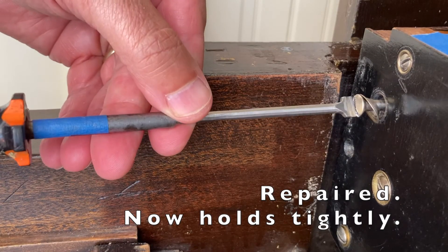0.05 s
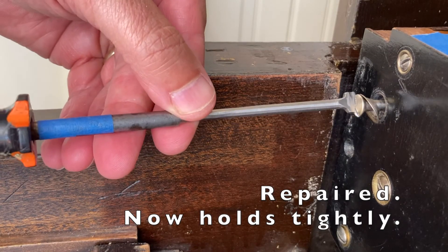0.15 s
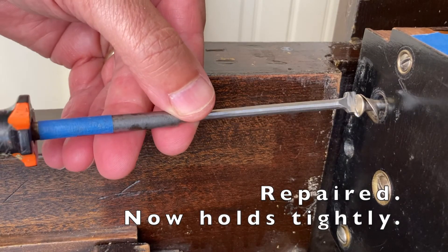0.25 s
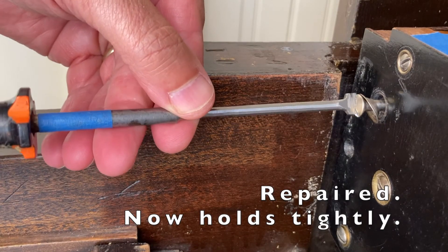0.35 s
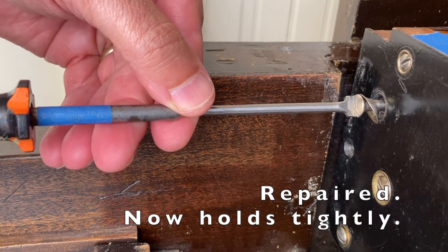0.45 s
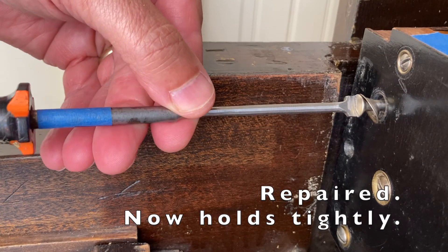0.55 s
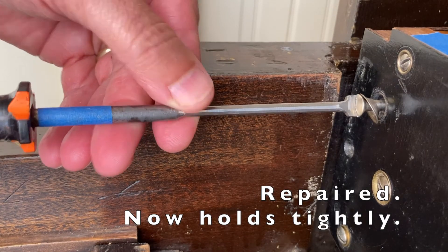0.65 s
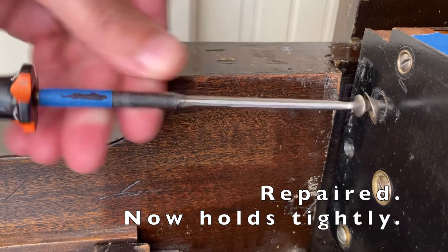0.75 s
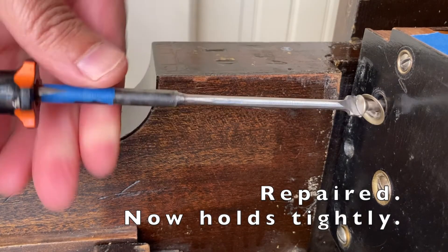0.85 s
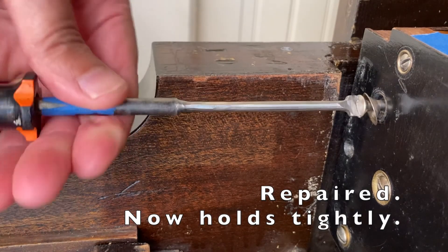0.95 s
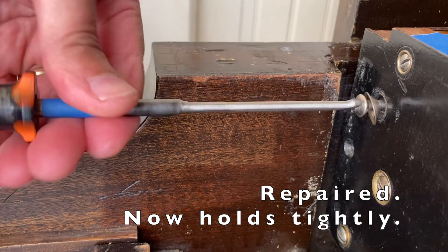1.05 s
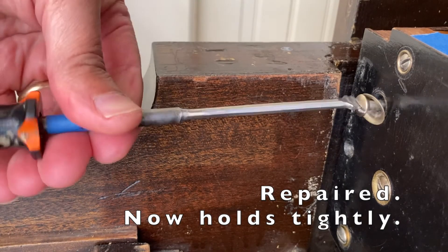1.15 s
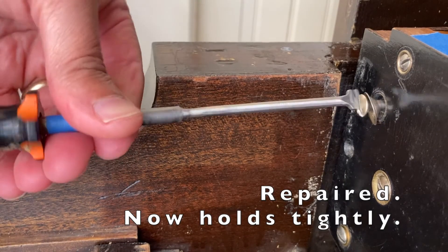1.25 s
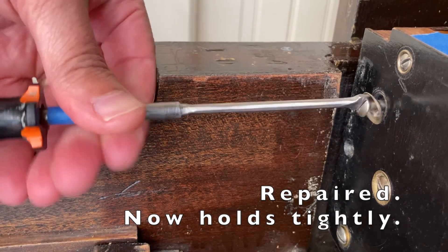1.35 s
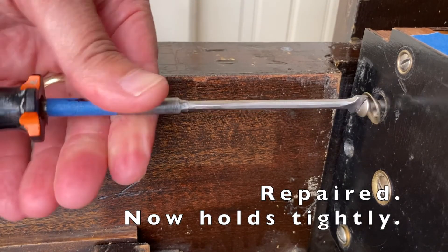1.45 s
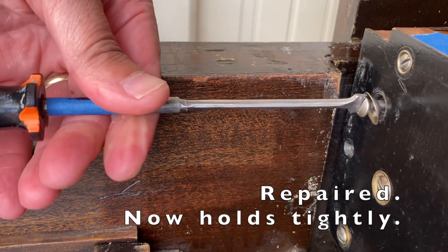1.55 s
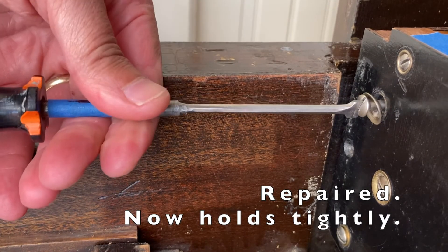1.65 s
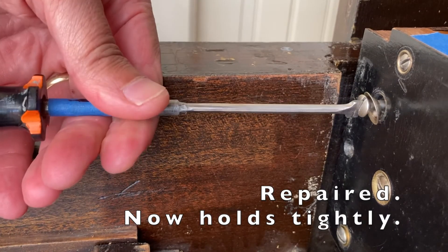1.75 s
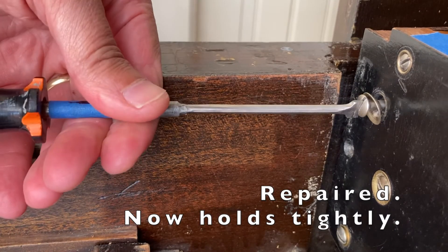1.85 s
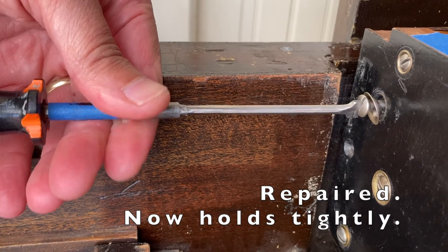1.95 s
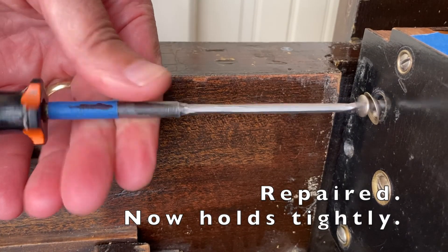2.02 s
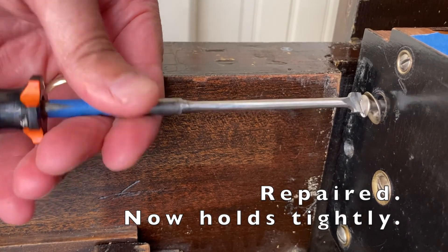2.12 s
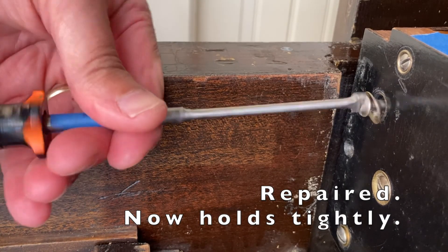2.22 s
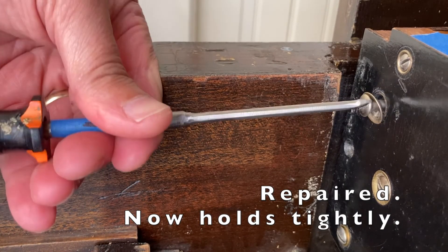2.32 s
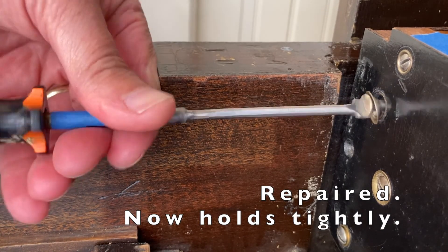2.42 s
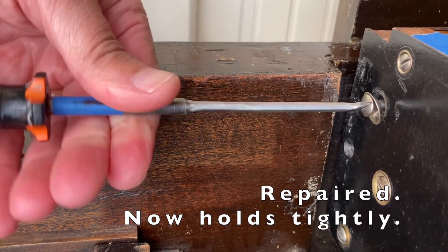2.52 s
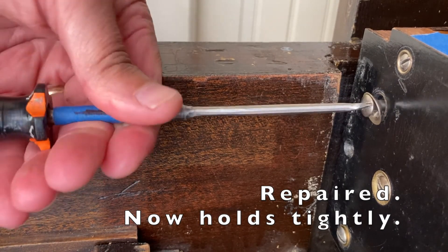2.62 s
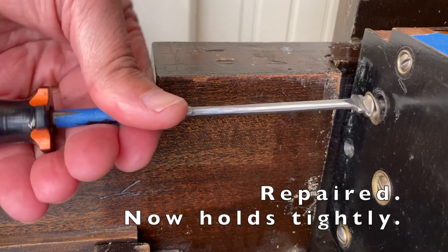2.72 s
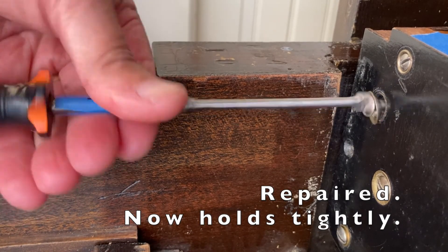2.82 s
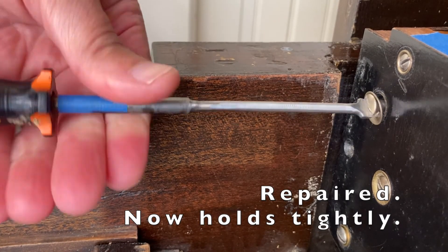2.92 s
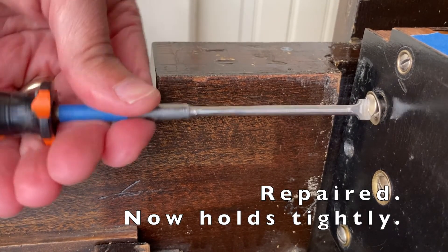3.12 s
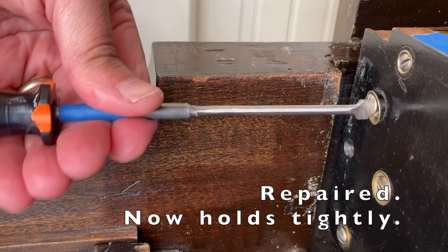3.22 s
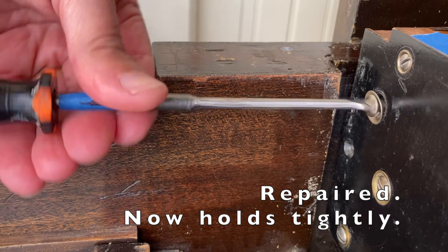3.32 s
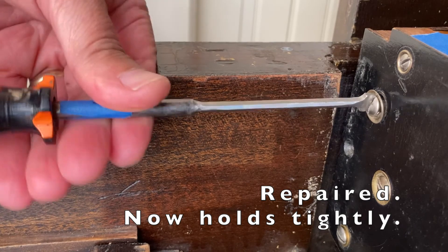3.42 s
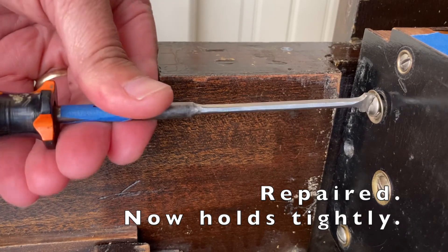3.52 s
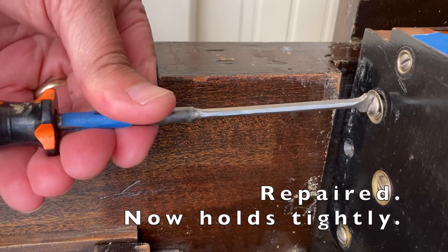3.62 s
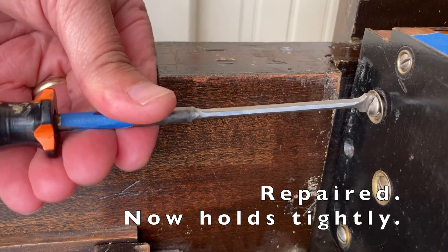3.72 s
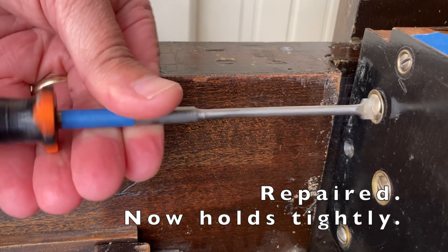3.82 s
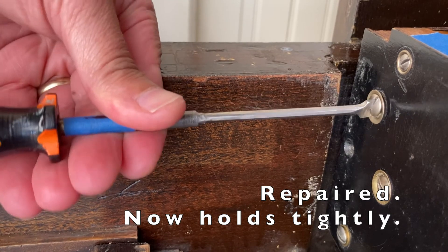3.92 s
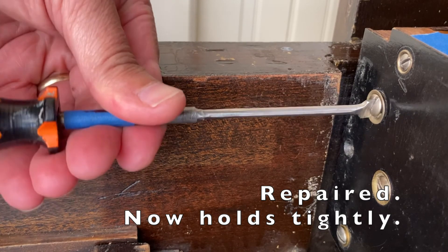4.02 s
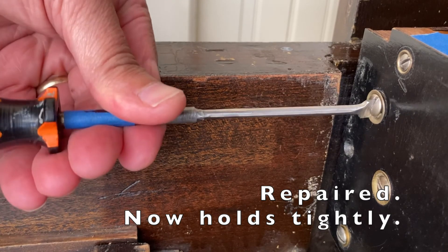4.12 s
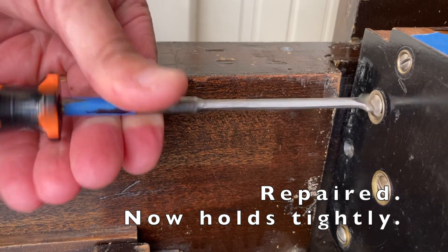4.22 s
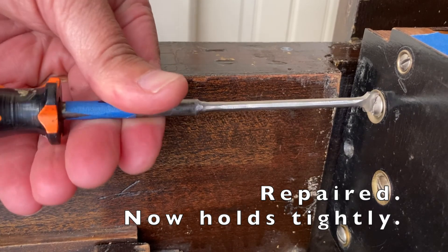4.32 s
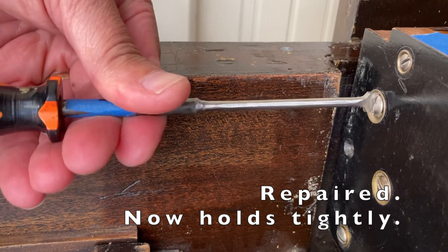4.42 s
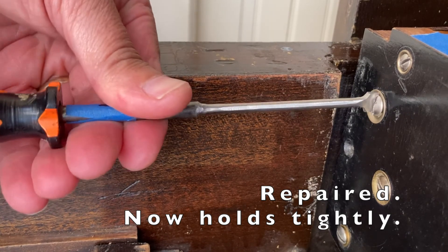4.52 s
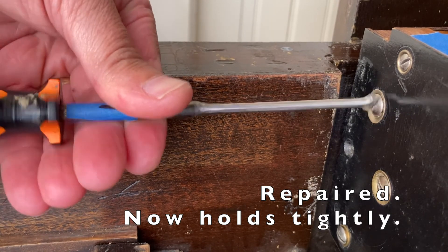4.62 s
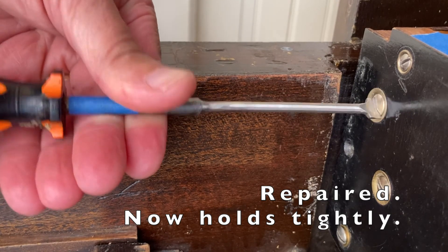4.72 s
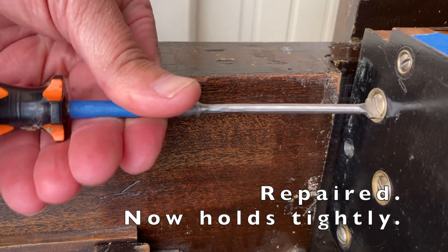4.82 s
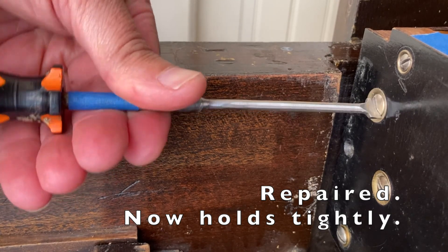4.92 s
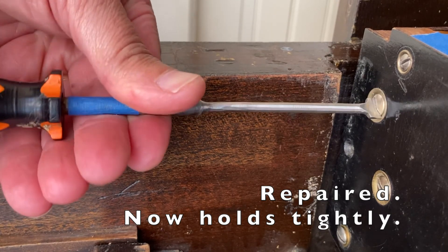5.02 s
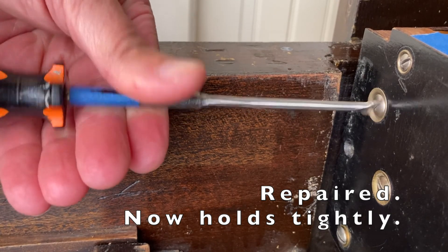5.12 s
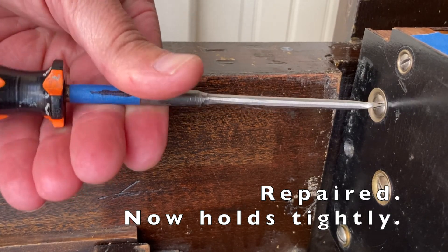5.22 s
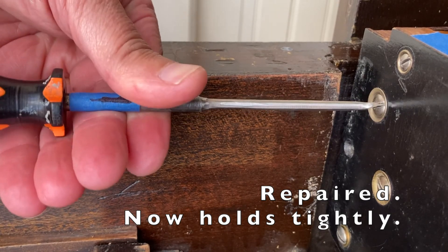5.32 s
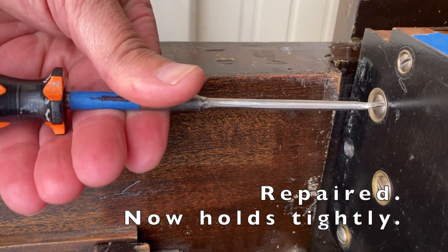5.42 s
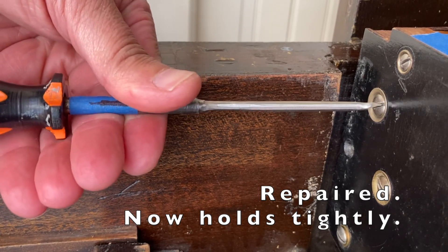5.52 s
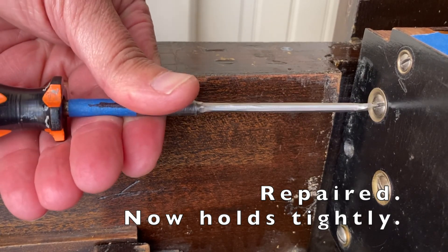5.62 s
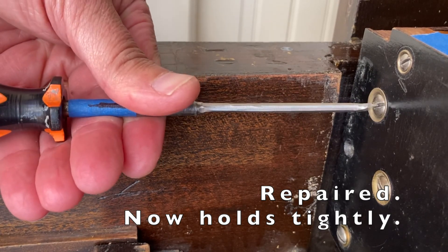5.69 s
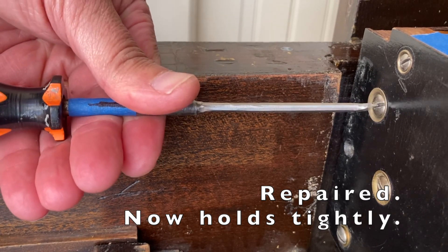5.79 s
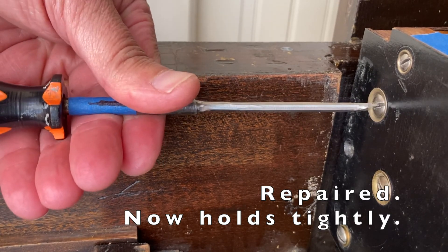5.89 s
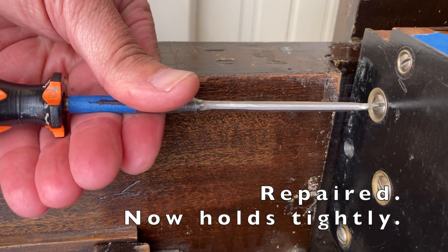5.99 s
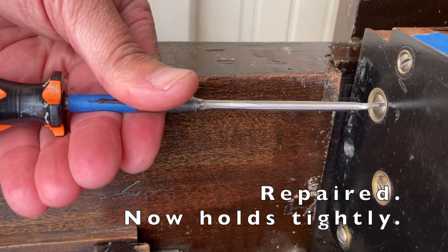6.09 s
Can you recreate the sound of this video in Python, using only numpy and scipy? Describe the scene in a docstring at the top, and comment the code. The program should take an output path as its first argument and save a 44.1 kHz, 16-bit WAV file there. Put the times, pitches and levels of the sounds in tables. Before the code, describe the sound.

Close, dry ticks and hollow wooden knocks as a hand twists a screwdriver, with short creaks, gritty scraping and faint skin hiss indoors.

```python
"""A flat screwdriver turns a slotted brass screw through a metal plate into a wooden case, close by.
From the start a small room rumbles faintly and the hand jostles the case, in low lumps of noise.
Soon the blade rasps (narrow noise), ticks (noise snaps, tool ring) and knocks the case (fading sines).
Then come squeaks and groans (gliding sines), and twist after twist of skin hiss, thread scrape and grit.
Near the end the hand comes to rest, amid the last knocks, ticks and twists."""
import sys
import numpy as np
from scipy import signal
from scipy.fft import rfft, irfft, next_fast_len
from scipy.io import wavfile
from scipy.ndimage import map_coordinates

SR = 44100
rng = np.random.default_rng(int(sys.argv[2]) if len(sys.argv) > 2 else 0)


def transcribe(signal):
    """Save signal, clipped to [-1, 1], as a 16-bit WAV file at the path in sys.argv[1]."""
    frames = np.atleast_2d(signal).T
    limited = np.clip(frames, -1, 1)
    pcm = np.round(limited * 32767).astype(np.int16)
    wavfile.write(sys.argv[1], SR, pcm)


N = 271215  # length in samples


def amp(db):
    """Turn decibels into a factor of amplitude."""
    return 10 ** (np.asarray(db) / 20)


def unit(x):
    """Scale a sound to rms 1."""
    return x / np.sqrt(np.mean(x ** 2) + 1e-20)


def along(points, hz):
    """Read a curve of (f/Hz, value) points on a log frequency axis."""
    f, v = np.transpose(points)
    return np.interp(np.log(hz + 1), np.log(f + 1), v)


def wobble(rate, size=N):
    """A smooth random curve through `rate` random points a second."""
    return map_coordinates(rng.standard_normal(int(size * rate / SR) + 4), [np.arange(size) * rate / SR])


def filtered(x, response):
    """Multiply the spectrum of x by a (possibly complex) function of frequency."""
    n = x.shape[-1]
    size = next_fast_len(n + SR // 8)  # spare room so that the end does not wrap round
    return irfft(rfft(x, size) * response(np.fft.rfftfreq(size, 1 / SR)), size)[..., :n]


def noise(spectrum, apart, size=N):
    """Coloured stereo noise of rms 1; apart is the size of the left-right difference against the middle."""
    mid, side = filtered(rng.standard_normal((2, size)), lambda hz: amp(along(spectrum, hz)))
    return unit(np.array([mid + apart * side, mid - apart * side]))


def add(track, s, sound):
    """Mix a sound into the track at time s."""
    part = track[:, max(round(s * SR), 0):][:, :sound.shape[-1]]
    part += sound[..., :part.shape[1]]


# the blade takes up its play in the slot: (t/s, level/dB, brightness/dB)
KNOCKS = [(0.137, -28.5, -2.5), (0.32, -44, -3.5), (0.368, -34.5, -3), (0.813, -43, -6.5),
          (1.016, -27.5, -6.5), (1.114, -33.5, -1), (1.371, -37.5, 0.5), (1.606, -44.5, -3),
          (1.633, -44.5, -7.5), (2.184, -47.5, -8.5), (2.212, -40, -13.5), (2.579, -33, 4.5),
          (2.633, -37.5, 3), (2.816, -47, -3.5), (3.033, -45.5, -2), (3.549, -42, -0.5), (3.768, -45, -22),
          (3.791, -38, -15.5), (3.913, -30, -14), (4.339, -40, -4.5), (4.437, -43.5, -3.5),
          (4.753, -35.5, -9.5), (4.961, -48, -5), (5.263, -60.5, 11)]
# the ways in which the case with its plate rings: (f/Hz, level/dB, t60/s)
CASE = [(208.8, -10.5, 0.22), (255, -6.5, 0.2), (314.8, -2.5, 0.17), (400, -6.5, 0.2), (520.6, -2.5, .06),
        (639.3, -0.5, 0.055), (1023, -2, 0.084), (1215, -3.5, 0.045), (1450, -6, 0.025),
        (1659, -16.5, 0.043), (1907, -20, 0.04)]


def knocks(hold_s=0.0084, attack_s=0.001, scatter_db=2, detune=0.012, phase_spread_rad=0.77, low_db=-1,
           crunch_db=-8.5, crunch_t60=0.15, early_s=0.02, lead_in_s=0.002):
    """The blade scrapes into the slot's wall and bears on it; the case's modes ring anew each time."""
    out, t = np.zeros((2, N)), np.arange(SR // 5) / SR
    hz, level, t60 = np.transpose(CASE)
    fade = amp(-60 * np.maximum(t - hold_s, 0) / t60[:, None]) * (1 - np.exp(-t / attack_s))
    family = np.digitize(hz, [450, 900])  # low, middle and high modes
    # the crunch swells up to the knock, then dies away
    swell = np.exp(np.minimum(t - early_s, 0) / lead_in_s)
    crunch = swell * amp(-60 * np.maximum(t - early_s, 0) / crunch_t60)
    for s, db, high in KNOCKS:
        low = bass(high)
        # each mode reaches the two microphones in a slightly different phase
        phase = rng.uniform(0, 2 * np.pi, (len(hz), 1))
        phase = phase + phase_spread_rad * rng.standard_normal((2, len(hz), 1))
        pitch = hz * (1 + detune * rng.standard_normal(len(hz)))
        strength = amp(level + scatter_db * rng.standard_normal(len(hz)))
        modes = strength[:, None] * fade * np.sin(2 * np.pi * pitch[:, None] * t + phase)
        for k, weight_db in enumerate([low + low_db, 0, high]):
            ring = modes[:, family == k].sum(1)
            add(out, s, amp(db + weight_db) * ring / np.abs(ring).max())
        # brighter knocks also crunch brighter
        grain = [(150, low - 13), (550, 10.0), (1300, high), (1900, high - 7), (2500, high - 15), (12000, -36)]
        add(out, s - early_s, amp(db + crunch_db) * crunch * noise(grain, apart=1.0, size=len(t)))
    return out


BASS_DB, BASS_TRADE = -5.5, 0.53  # low modes of a knock; dB that they lose per dB of brightness


def bass(brightness):
    """The softer the contact, the more it drives the low modes (dB)."""
    return BASS_DB - BASS_TRADE * brightness


# steel edges snap over brass and ring the tool: (t/s, snap level/dB, ring level/dB)
TICKS = [(0.065, -54.5, -53.5), (0.138, -42.5, -45.5), (0.37, -46, -40), (0.8152, -40, -60),
         (0.953, -49, -69), (1.0025, -41, -42.5), (1.117, -32, -39), (1.336, -53, -52), (1.37, -37.5, -43),
         (1.433, -46, -58.5), (1.6072, -41, -47.5), (1.6315, -39, -52), (1.983, -50.5, -64),
         (2.015, -43.5, -54), (2.431, -47, -54.5), (2.529, -56, -52.5), (2.582, -37.5, -39.5),
         (2.6333, -28.5, -36.5), (2.727, -44, -76), (3.031, -42, -61), (3.0675, -35, -49),
         (3.4757, -42.5, -45.5), (3.5499, -38, -43.5), (3.639, -68, -57), (3.702, -62, -59.5),
         (3.769, -37, -49), (3.937, -48, -45.5), (4.2047, -37, -51.5), (4.347, -43, -57),
         (4.4366, -38, -46), (4.6358, -36, -48), (4.6844, -40, -52.5), (4.7815, -41.5, -52),
         (4.9645, -44.5, -51.5), (5.0684, -43.5, -58), (5.0938, -35, -53), (5.108, -36, -55),
         (5.263, -61, -50.5), (5.29, -39, -59)]
# colour of the snap: (f/Hz, level/dB)
EDGE = [(1500, -28), (3000, -4.5), (7400, 2), (9000, 3), (15200, -1.5), (16500, -19)]


def ticks(snap_t60=0.01, chatter_t60=0.07, chatter_db=-26, edge_db=-6.5, tool_db=2):
    """The blade's edge snaps hard with a brief chatter, and the tool rings."""
    out, t = np.zeros((2, N)), np.arange(SR // 10) / SR
    fade = amp(edge_db) * (amp(-60 * t / snap_t60) + amp(chatter_db - 60 * t / chatter_t60))
    for s, snap_db, ring_db in TICKS:
        snap = amp(snap_db) * fade * noise(EDGE, apart=0.081, size=len(t))
        add(out, s, snap + amp(ring_db + tool_db) * shaft_ring(t))
    return out


# the ways in which the steel shaft rings, seated in the screw: (f/Hz, level/dB, t60/s)
SHAFT = [(1031, -5, 0.057), (2143, -0.5, 0.015), (2570, -10, 0.023), (3220, -11.5, 0.036),
         (3750, -8, 0.014), (4565, -9, 0.021)]


def shaft_ring(t, scatter_db=3, detune=0.025, phase_spread_rad=0.7, rise_s=0.00034):
    """One light touch rings the tool, peak 1; the point of contact sets how strongly each mode speaks."""
    hz, level, t60 = np.transpose(SHAFT)[:, :, None]
    modes = amp(level + scatter_db * rng.standard_normal(hz.shape) - 60 * t / t60)
    pitch = hz * (1 + detune * rng.standard_normal(hz.shape))
    phase = rng.uniform(0, 2 * np.pi, hz.shape)
    phase = phase + phase_spread_rad * rng.standard_normal((2, len(hz), 1))
    ring = (modes * np.sin(2 * np.pi * pitch * t + phase)).sum(1) * (1 - np.exp(-t / rise_s))
    return ring / np.abs(ring).max()


# the thread slips in the wood or the blade on the brass: (t/s, length/s, first f/Hz, last f/Hz, level/dB)
SLIPS = [(0.367, 0.087, 314, 176, -48), (1.014, 0.052, 416, 293, -40.5), (1.113, 0.027, 512, 520, -17.5),
         (2.245, 0.064, 444.3, 167, -48), (2.724, 0.0096, 7450, 7680, -50.5), (3.786, 0.055, 364, 280, -37),
         (3.786, 0.036, 188, 114, -31), (4.68, 0.0126, 3030, 3840, -51), (4.723, 0.0041, 3050, 3750, -54),
         (4.799, 0.0066, 3660, 2660, -53), (4.82, 0.0539, 418, 166, -46)]
# colour of the thread grinding, for slips and twists: (f/Hz, level/dB)
SCRAPE = [(90, -15), (220, 8.5), (550, 8), (860, -9.5), (1030, -10.5), (1300, -12.5), (2100, -29),
          (4000, -25), (8000, -48)]


def slips(overtone_db=-28, overtone_db_per_octave=7, rough_db=5, right_lead_rad=0.9,
          after_db=-17.5, after_cycles=220, grind_db=-6):
    """Contact sticks and slips fast enough to sing, then rings on; a wider glide is rougher and grinds more."""
    out, t = np.zeros((2, N)), np.arange(SR // 3) / SR
    for s, length, first_hz, last_hz, db in SLIPS:
        u = np.minimum(t / length, 1)  # progress of the slip, 0 to 1
        slide = np.log(last_hz / first_hz)
        pitch = first_hz * np.exp(slide * (u + 0.2 * wobble(250, size=len(t))))
        phase = 2 * np.pi * np.cumsum(pitch) / SR + np.array([[0], [right_lead_rad]])
        # only a steady pitch builds up a lasting ring
        t60 = after_cycles / last_hz / (1 + 20 * abs(slide))
        swell = np.sin(np.pi * u) + u * amp(after_db - 60 * t / t60)
        level = amp(db + rough_db * slide * wobble(203, size=len(t)))
        # high squeaks of metal are richer
        overtone = amp(overtone_db + overtone_db_per_octave * np.log2(first_hz / 500))
        tone = np.sin(phase) + overtone * np.sin(2 * phase)
        grind = amp(grind_db) * abs(slide) * noise(SCRAPE, apart=0.99, size=len(t))
        add(out, s, swell * level * (tone + grind))
    return out


# each twist of the tool: (t/s, length/s, effort level/dB)
TWISTS = [(0.648, 0.1, -71), (0.731, 0.73, -74), (0.97, 0.19, -68.5), (1.266, 0.23, -73), (2.006, 0.1, -71),
          (2.165, 0.066, -67.5), (2.425, 0.094, -67), (2.613, 0.14, -68.5), (2.809, 0.084, -67.5),
          (3.026, 0.1, -71), (3.304, 0.11, -69.5), (3.462, 0.11, -67.5), (3.753, 0.257, -67.5),
          (4.189, 0.049, -62.5), (4.334, 0.11, -68.5), (4.611, 0.26, -68.5), (5.078, 0.042, -66),
          (5.26, 0.045, -73)]
ATTACK_S, SAG_DB_PER_S, RELEASE_S = 0.0099, 41, 0.02  # a twist bites at once, slackens, and lets go


def effort():
    """The turning force: every twist rises fast, sags while it lasts and dies away."""
    t, force = np.arange(N) / SR, np.zeros(N)
    for s, length, db in TWISTS:
        bite = (1 + np.tanh((t - s) / ATTACK_S)) / 2
        sag = amp(db - SAG_DB_PER_S * np.clip(t - s, 0, length))
        force += bite * sag * np.exp(-np.maximum(t - s - length, 0) / RELEASE_S)
    return force


# colour of skin sliding on the shaft: (f/Hz, level/dB)
SKIN = [(500, -25), (1500, 6), (2200, -4), (3500, -3.5), (5600, 9.5), (11000, 8.5), (15200, 7),
        (16300, -12)]


def twists(force, hiss_db=3.0, scrape_db=12.5, grain_db=3.5, scrape_grain_db=2.5, colour_db=2.0):
    """With the turning force, skin hisses on the shaft and the thread grinds through the case."""
    pressure = amp(3 * wobble(45))
    skin = noise(SKIN, apart=0.25)
    dull = filtered(skin, lambda hz: hz < 5000)
    # the shaft's share comes and goes with the grip
    skin = skin + dull * (amp(colour_db * wobble(76)) - 1)
    skin = unit(skin * pressure * amp(grain_db * wobble(400)))
    thread = noise(SCRAPE, apart=0.6)
    thread = unit(thread * np.sqrt(pressure) * amp(scrape_grain_db * wobble(150)))
    return force * (amp(hiss_db) * skin + amp(scrape_db) * thread)


def grit(force, catches_per_s=420, grit_db=4, count=5):
    """As it turns, the blade catches and frees itself in tiny uneven steps, each of which rings the tool."""
    out, t = np.zeros((2, N)), np.arange(SR // 20) / SR
    for contact in range(count):  # each point of contact has its own ring
        catches = np.zeros(N)
        at = rng.random((int(catches_per_s * N / SR / count), 2))
        catches[(at[:, 0] * N).astype(int)] = -np.log(at[:, 1])  # many weak, few strong
        out += signal.oaconvolve((force * catches)[None], shaft_ring(t), axes=1)[:, :N]
    return amp(grit_db) * out


# the blade drags across the screw head: (t/s, length/s, pitch f/Hz, level/dB)
RASPS = [(0.014, 0.12, 2026, -67), (1.114, 0.024, 2450, -50.5), (1.366, 0.024, 2490, -44),
         (1.603, 0.069, 2560, -58), (2.058, 0.035, 3030, -71), (3.47, 0.015, 3470, -58),
         (4.354, 0.032, 3550, -64), (4.632, 0.074, 3200, -62), (4.772, 0.065, 3080, -68),
         (4.961, 0.0085, 4080, -59)]


def rasps(slip_db=4, slip_rate=300, skirt_db=-26, skirt_ratio=1.82):
    """The blade's flank judders along the brass: a rough, narrow band that comes in spurts."""
    out = np.zeros((2, N))
    shoulder = skirt_ratio ** (1 / 4)
    for s, length, hz, db in RASPS:
        size = int(length * SR)
        # flat around the pitch, falling steeply on both sides
        below = [(hz / skirt_ratio / 2, -80), (hz / skirt_ratio, skirt_db), (hz / shoulder, 0)]
        above = [(hz * shoulder, 0), (hz * skirt_ratio, skirt_db), (hz * skirt_ratio * 2, -80)]
        spurts = amp(slip_db * wobble(slip_rate, size=size))
        rough = unit(noise(below + above, apart=0.95, size=size) * spurts)
        add(out, s, amp(db) * np.hanning(size) * rough)
    return out


# colour of the case being shaken: (f/Hz, level/dB)
JOSTLE = [(28, -26), (65, 2.5), (130, 2), (220, -4.5), (350, -16), (3000, -51.5)]
GRIP_DB, LET_GO_S, SETTLE_DB_PER_S = -60.5, 4.94, 17  # the hand's steady tremor, and how it comes to rest
SHAKE_DB, SHAKE_T60 = -19.5, 1.2  # the case sways after each knock, relative to the knock's bass


def jostling(force, effort_db=9, lumps_db=2, lean_db=1):
    """The hand shakes the case in soft, low lumps: a little in its grip, more in twists and after knocks."""
    t = np.arange(N) / SR
    grip = amp(GRIP_DB - SETTLE_DB_PER_S * np.maximum(t - LET_GO_S, 0))
    power = grip ** 2 + (amp(effort_db) * force) ** 2
    for s, db, brightness in KNOCKS:
        sway = amp(db + bass(brightness) + SHAKE_DB - 60 * np.abs(t - s) / SHAKE_T60)
        power += (t > s) * sway ** 2
    lumps = unit(noise(JOSTLE, apart=0.22) * amp(lumps_db * wobble(40)))
    return np.sqrt(power) * lumps * amp([[-lean_db], [lean_db]])  # a little to the right


# how long the room rings: (f/Hz, t60/s)
ROOM = [(100, 0.71), (1400, 0.24), (3000, 0.16), (5000, 0.27), (15000, 0.013)]


def room(x, build_up_s=0.0026):
    """Noise that fades at its own speed in each band makes a diffuse tail; low notes last longest."""
    hz, t, z = signal.stft(rng.standard_normal((2, SR // 2)), SR, nperseg=256)
    fade = amp(-60 * t / along(ROOM, hz)[:, None]) * (1 - np.exp(-t / build_up_s))
    tail = signal.istft(z * fade, SR, nperseg=256)[1]
    tail = tail + 0.5 * tail[::-1]  # close microphones share part of it
    return signal.fftconvolve(x.mean(0)[None], tail / np.linalg.norm(tail[0]), axes=1)[:, :N]


# colours of the faint room rumble and of the hiss: (f/Hz, level/dB)
RUMBLE = [(20, -24), (45, 5.5), (68, 4.5), (110, -8.5), (500, -24), (1200, -49.5), (8000, -41)]
HISS = [(1000, 6.5), (12000, -8), (16000, -25)]


def background():
    """Steady coloured noise: a faint low rumble and a fainter hiss."""
    return amp(-68) * noise(RUMBLE, apart=0.25) + amp(-81.5) * noise(HISS, apart=1)


def scene():
    """Case and tool sound close by, the case a little to the left; the room answers over its faint floor."""
    left = amp([[1.1], [-1.1]])
    wood, squeaks = knocks() * left, slips() * left
    force = effort()
    metal = ticks() + twists(force) + grit(force) + rasps()
    tail = room(amp(-16.5) * wood + amp(-17.0) * squeaks + amp(-18.0) * metal)
    return wood + squeaks + metal + jostling(force) + tail + background()


# how far the left microphone leads the right: (f/Hz, phase/rad)
PORTS = [(4000, 0), (6900, -6.28), (15900, -18.85)]
TOP_HZ = 16550  # band limit


def record(dry):
    """Two close microphones hear the treble out of step; nothing passes above the band limit."""
    def response(hz):
        lead = np.interp(hz, *np.transpose(PORTS)) * np.array([[0.5], [-0.5]])
        return np.exp(1j * lead) * (hz < TOP_HZ)
    return filtered(dry, response)


dry = scene()
out = record(dry)
transcribe(out)
```